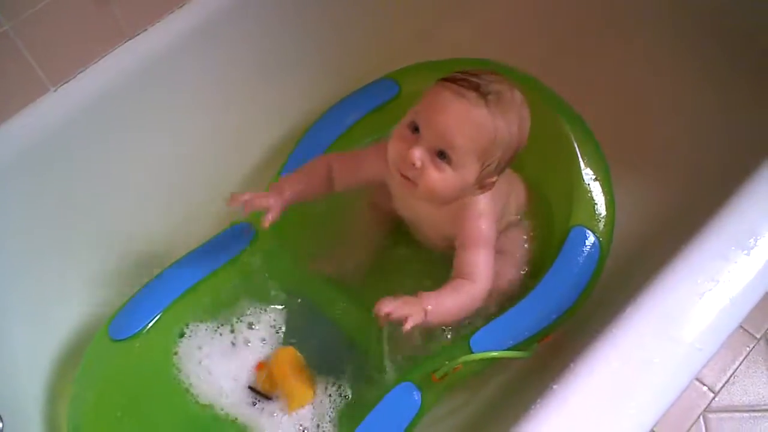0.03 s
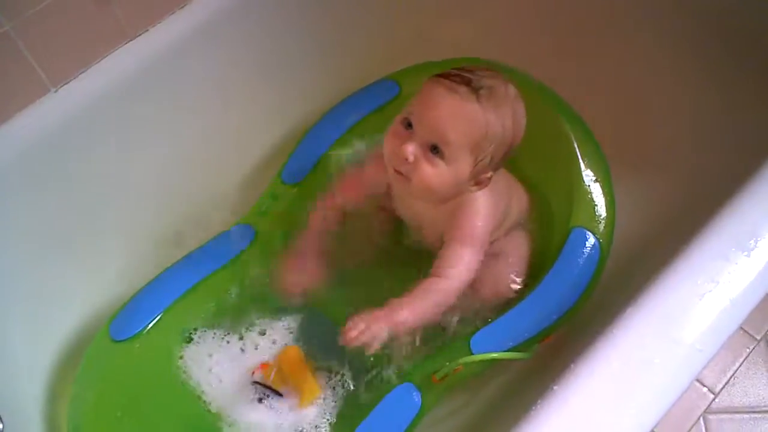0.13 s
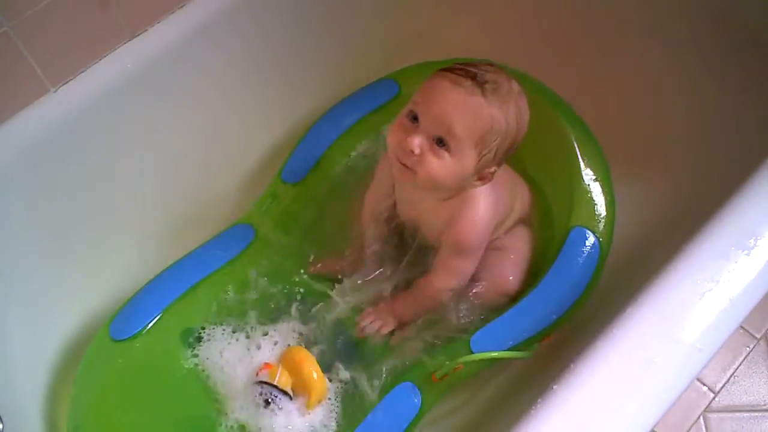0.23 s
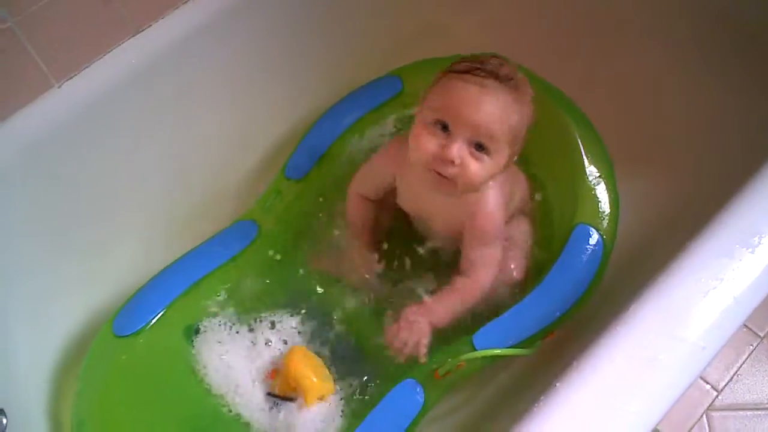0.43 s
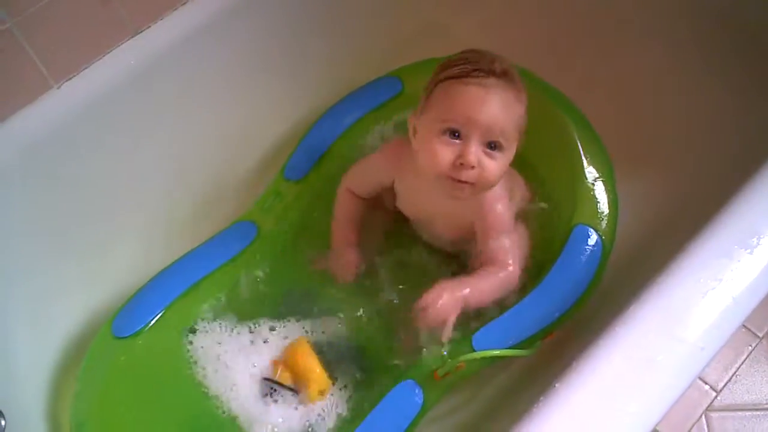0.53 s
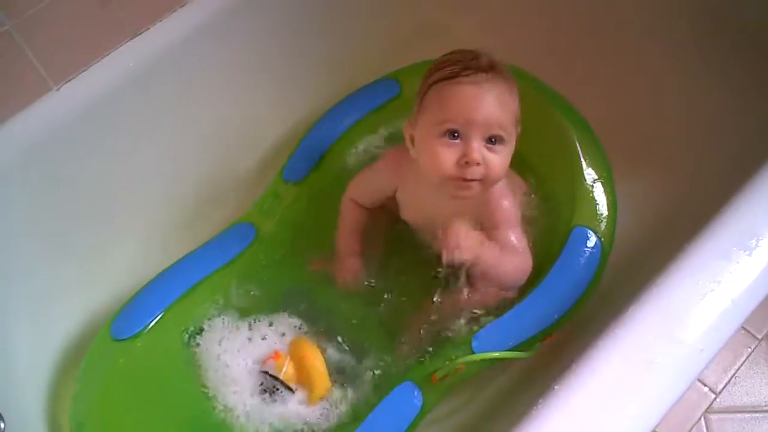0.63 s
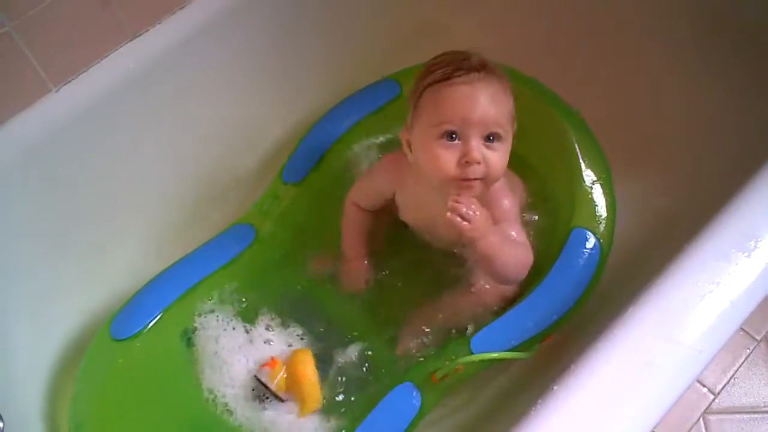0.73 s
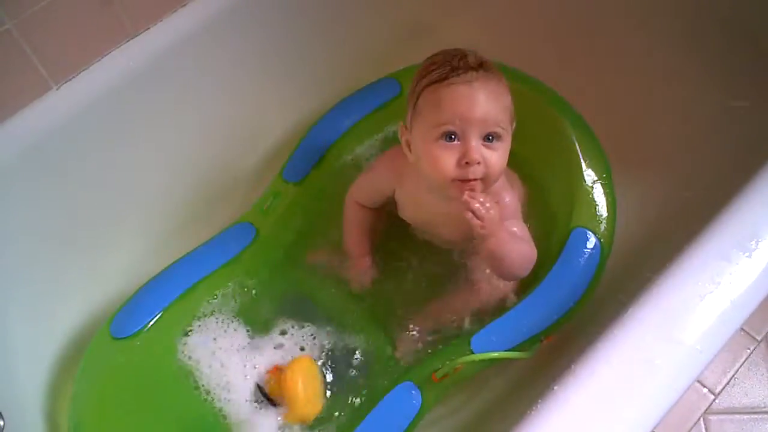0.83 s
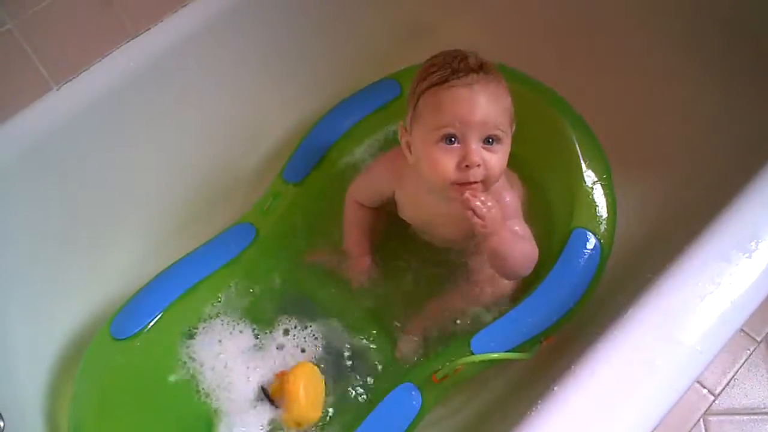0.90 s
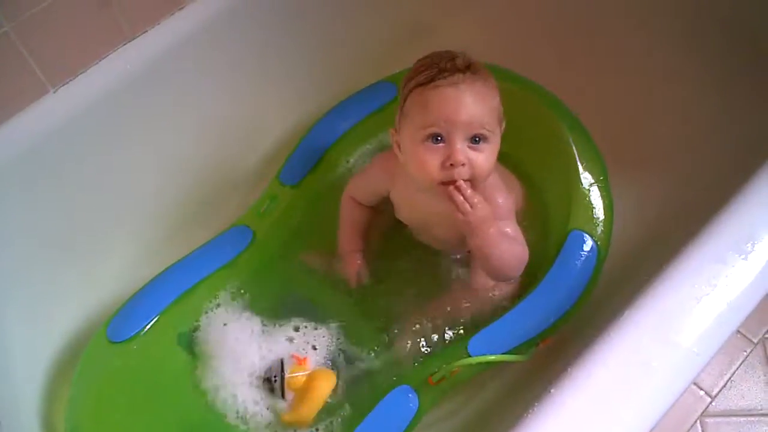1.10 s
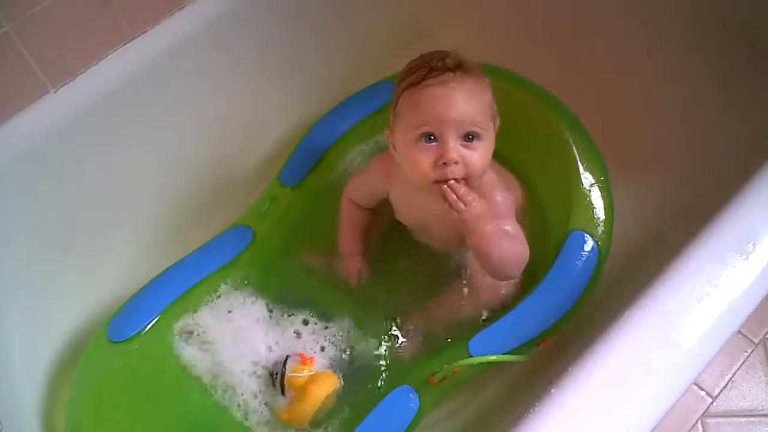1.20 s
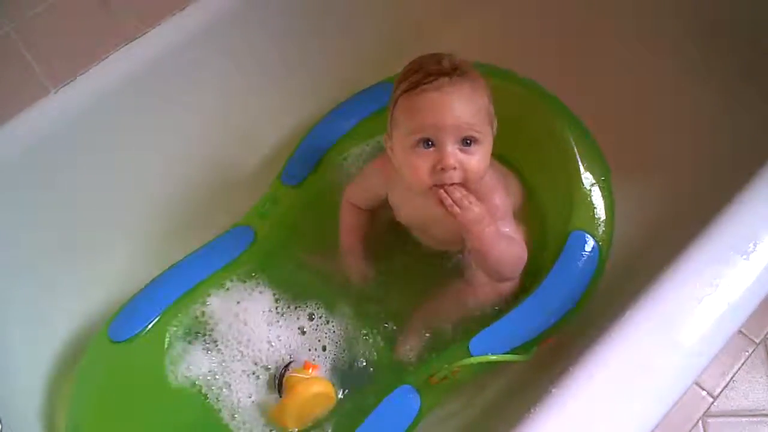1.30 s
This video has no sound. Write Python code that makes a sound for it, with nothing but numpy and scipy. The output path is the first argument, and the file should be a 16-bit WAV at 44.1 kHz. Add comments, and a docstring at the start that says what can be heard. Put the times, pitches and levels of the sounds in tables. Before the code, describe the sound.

A baby's hands slap and churn bathwater, which calms to drips in a tiled bathroom.

```python
"""A baby's hands slap bath water: sharp smacks, spray, soft thuds, two gulps as air pockets close.
Trapped bubbles ring; the churning settles into single drips and bubbles.
Tub walls and bathroom tiles echo, over a faint steady noise floor."""
import sys
import numpy as np
from scipy import signal
from scipy.fft import rfft, irfft, next_fast_len
from scipy.io import wavfile
from scipy.ndimage import map_coordinates

SR = 44100
rng = np.random.default_rng(int(sys.argv[2]) if len(sys.argv) > 2 else 0)


def bounce(signal):
    """Save signal as a 16-bit WAV file at the path given by the first command-line argument."""
    frames = np.transpose(np.atleast_2d(signal))
    limited = np.clip(frames, -1, 1)
    pcm = np.round(limited * 32767).astype(np.int16)
    wavfile.write(sys.argv[1], SR, pcm)


N = 59535

# All levels are relative.
# Impacts of hands and thrown water (time [s], level [dB], t60 [s], centre [Hz], half-width [oct])
SMACK_HITS = [(0.136, -43.5, 0.032, 2010, 0.84), (0.235, -58, 0.03, 8600, 0.3),
              (0.244, -34.5, 0.014, 7950, 0.27), (0.2526, -32, 0.0091, 1450, 0.52),
              (0.2526, -19.5, 0.0097, 7260, 0.64), (0.285, -38, 0.043, 6040, 0.58),
              (0.2963, -39, 0.033, 4600, 1.5), (0.44, -36.5, 0.021, 5650, 0.51),
              (.514, -38.5, 0.02, 5900, 0.47), (0.556, -37.5, 0.02, 3960, 0.44),
              (0.566, -38.5, 0.026, 4470, 0.43), (0.611, -52.5, 0.13, 4240, 1.1),
              (.661, -40.5, 0.022, 6700, 0.36), (0.7025, -38.5, 0.016, 5000, 0.55),
              (.744, -49.5, 0.037, 2480, 0.56), (0.801, -57.5, 0.025, 6500, 0.24),
              (0.87, -62, 0.063, 5340, .5), (0.8941, -52.5, 0.031, 3400, 0.29),
              (0.908, -60.5, 0.044, 4600, 0.49), (0.92, -55.5, 0.02, 6750, 0.71),
              (0.926, -50, 0.034, 1800, 0.31), (0.935, -35, 0.0071, 5170, 0.3),
              (.954, -49, 0.03, 3130, 0.39), (1.045, -56, 0.023, 4000, 0.23),
              (1.193, -60, 0.042, 685, 0.57)]
# Large spray drops landing (time [s], level [dB])
DROP_HITS = [(0.247, -37.5), (0.3294, -33), (0.3567, -42), (0.364, -32.5), (0.3753, -34), (0.4417, -44),
             (0.514, -43), (.521, -35.5), (0.5514, -38), (.571, -34.5), (0.617, -47), (0.7047, -49),
             (.922, -52)]
# Hands pushing into the water (time [s], level [dB])
THUD_HITS = [(.252, -61), (0.287, -63.5), (0.36, -64.5), (0.503, -68.5), (0.568, -66.5)]
# Single bubbles and drips (time [s], level [dB], pitch [Hz], t60 [s])
BUBBLE_RINGS = [(.002, -52.5, 1160, 0.027), (0.023, -53, 3990, 0.018), (0.033, -53.5, 5030, 0.021),
                (.037, -52.5, 2070, 0.019), (.061, -53, 1575, 0.052), (.069, -57, 5320, 0.016),
                (.078, -46, 2640, 0.014), (.089, -48.5, 2280, 0.014), (.139, -50, 675, 0.021),
                (.146, -63.5, 290, 0.094), (.253, -29, 2000, 0.0076), (.274, -35.5, 3170, 0.011),
                (.302, -29.5, 4950, 0.0088), (.338, -42, 2050, 0.019), (.347, -40, 1554, 0.016),
                (.378, -56.5, 226, 0.05), (.386, -46.5, 375, 0.052), (0.394, -38, 2576, 0.034),
                (.397, -32.5, 1175, 0.017), (0.408, -35.5, 1534, 0.029), (.417, -27.5, 2873, 0.011),
                (.448, -38.5, 577, 0.018), (.454, -37, 835, 0.019), (.449, -49, 323, 0.027),
                (.466, -29, 1470, 0.021), (.497, -37.5, 5250, 0.0089), (.515, -36.5, 1489, 0.054),
                (.521, -36.5, 1840, 0.032), (.521, -38, 3140, 0.023), (.524, -38, 845, 0.016),
                (.571, -25, 1190, 0.0038), (.613, -40.5, 1830, 0.036), (.653, -40.5, 1079, 0.046),
                (.655, -32.5, 2148, 0.017), (.662, -35, 1490, 0.013), (0.744, -36, 2027, 0.014),
                (0.88, -39, 1890, 0.0068), (.928, -37.5, 1178, 0.031), (.955, -37, 3670, 0.0056),
                (.956, -38, 3070, 0.0091), (.957, -38, 1920, 0.0068), (1.048, -57.5, 2120, 0.019),
                (1.110, -60.5, 1514, 0.035), (1.131, -64.5, 9900, 0.013), (1.192, -54, 1194, 0.03),
                (1.236, -55, 1780, 0.011), (1.253, -53, 1620, 0.013), (1.282, -65.5, 6680, 0.025),
                (1.297, -62.5, 3860, 0.018)]
# Air pockets closing under a hand (time [s], length [s], level [dB], start pitch [Hz], end pitch [Hz])
GULP_SWEEPS = [(0.38, .034, -42.5, 480, 1651), (0.444, .031, -40, 562, 2460)]
# Churn envelopes (time [s], spray [dB], bubbling [dB], slosh [dB])
CHURN_LEVELS = [(0, -64, -59, -68), (.04, -65.5, -59, -89), (0.089, -59.5, -66, -91),
                (.11, -66.5, -69, -81), (.17, -67, -78, -66), (.23, -75, -74, -80), (0.244, -61, -74, -61),
                (0.259, -46, -54, -75), (.282, -54, -54, -62.5), (.34, -52, -43, -56.5),
                (0.37, -51.5, -53, -54.5), (0.407, -49.5, -41.5, -51), (0.456, -61, -46.5, -56.5),
                (.49, -51.5, -50, -64), (.53, -61, -43, -60.5), (.597, -52, -56, -61.5),
                (0.651, -53, -43, -69), (.73, -61, -62, -80), (.79, -71.5, -77, -76.5),
                (1.35, -74.5, -77, -86)]
# Spectral shape per source (frequency [Hz], gain [dB])
DROP_EQ = [(1000, -24), (4500, 4.5), (9500, 2), (12500, -21), (16000, -24)]
THUD_EQ = [(20, -23), (45, -21), (110, -19.5), (240, 10), (500, -25), (1500, -62)]
SPRAY_EQ = [(1500, -7.5), (3200, 0.5), (5000, -1.5), (8500, -6.5), (10500, -13.5), (12500, -21),
            (16000, -28)]
BUBBLING_EQ = [(350, -13.5), (600, -10.5), (1000, -2.5), (1500, 0.5), (2000, -2.5), (2500, -4), (3500, -9),
               (5000, -10)]
SLOSH_EQ = [(25, -32), (70, -33), (150, -13), (230, 0), (400, -3.5), (650, 5.5), (1100, -5)]
FLOOR_EQ = [(25, -26), (70, -19), (150, -7), (280, 3.5), (600, 4), (1500, 2), (3000, -4.5), (8000, -18.5),
            (12000, -16), (16000, -21)]
# Decay of the tiled room (frequency [Hz], t60 [s])
ROOM_T60 = [(200, 0.58), (1200, 0.31), (3500, 0.25), (8000, 0.23), (15000, 0.2)]


def smacks(attack_s=0.0016):
    """Each impact bursts into a short crackle of droplets."""
    out, t = np.zeros(N), np.arange(SR // 10) / SR
    for at_s, db, t60_s, centre_hz, width_oct in SMACK_HITS:
        def band(hz):
            detune = np.log2((hz + 1) / centre_hz) / width_oct
            return (1 + detune ** 2 / 4) ** -2 / np.sqrt(1 + (hz / 11000) ** 12)
        crackle = unit_rms(filtered(rng.standard_normal(len(t)), band))
        attack = (1 - np.exp(-t / attack_s)) ** 2
        add(out, at_s, amp(db + 7.5 - 60 * t / t60_s) * attack * crackle)
    return out


def drops(t60_s=0.0058):
    """A falling drop hits the surface with one bright tick."""
    out, t = np.zeros(N), np.arange(SR // 30) / SR
    for at_s, db in DROP_HITS:
        add(out, at_s, amp(db - 60 * t / t60_s) * noise(len(t), DROP_EQ))
    return out


def thuds(t60_s=0.11, attack_s=0.00097):
    """Each push on the water gives a faint low thud."""
    out, t = np.zeros(N), np.arange(SR // 4) / SR
    attack = 1 - np.exp(-t / attack_s)
    for at_s, db in THUD_HITS:
        add(out, at_s, amp(db - 60 * t / t60_s) * attack * noise(len(t), THUD_EQ))
    return out


def bubbles(rise=0.038, wobble_depth=0.054, wobble_per_s=510, attack_s=0.00089):
    """A trapped bubble rings, unsteady in moving water, its pitch rising as it nears the surface."""
    out, t = np.zeros(N), np.arange(SR // 6) / SR
    attack = 1 - np.exp(-t / attack_s)
    for at_s, db, hz, t60_s in BUBBLE_RINGS:
        age = t / t60_s
        pitch_hz = hz * (1 + rise * np.minimum(age, 1) + wobble_depth * wobble(wobble_per_s, len(t)))
        decay = amp(db + 2 - 60 * age ** 1.554)  # holds, then dies quickly
        add(out, at_s, decay * attack * np.sin(2 * np.pi * np.cumsum(pitch_hz) / SR))
    return out


def gulps(spread=0.1238, swell_db=15.5):
    """A shrinking air pocket sweeps three close partials upward, swelling until it shuts."""
    out = np.zeros(N)
    for at_s, length_s, db, start_hz, end_hz in GULP_SWEEPS:
        progress = np.linspace(0, 1, int(length_s * SR))
        turns = np.cumsum(start_hz * (end_hz / start_hz) ** progress) / SR
        partials = sum(amp(-5 * abs(k)) * np.sin(2 * np.pi * (turns * np.exp(k * spread) + rng.random()))
                       for k in (-1, 0, 1))
        envelope = amp(swell_db * progress) * signal.windows.tukey(len(progress), 0.3)
        add(out, at_s, amp(db) * unit_rms(partials * envelope))
    return out


def churn(clump_db=0.5, clumps_per_s=200, tick_db=-10):
    """Stirred water: clumping spray with sparse droplet ticks, mid-sized bubbles, deep slosh."""
    times_s, *levels_db = np.transpose(CHURN_LEVELS)
    spray_gain, bubbling_gain, slosh_gain = [
        amp(np.interp(np.arange(N) / SR, times_s, db)) for db in levels_db]
    mist = swarm(2000, band_hz=(2550, 15100), cycles=5, spread_db=4.2, rise=0.05, hiss=0.42, size=160)
    ticks = swarm(130, band_hz=(3200, 11700), cycles=2.7, spread_db=2.5, rise=0.1, hiss=0.02, size=128)
    spray = unit_rms(mist * amp(clump_db * wobble(clumps_per_s, N))) + amp(tick_db) * ticks
    bubbling = swarm(1800, band_hz=(557.4, 4170), cycles=17.5, spread_db=3,
                     rise=0.24, hiss=0.16, size=1024)
    slosh = swarm(600, band_hz=(205.2, 869), cycles=8.3, spread_db=2, rise=0.14, hiss=0.69, size=2048)
    return (spray_gain * coloured(spray, SPRAY_EQ)
            + bubbling_gain * coloured(bubbling, BUBBLING_EQ)
            + slosh_gain * coloured(slosh, SLOSH_EQ))


def swarm(count, band_hz, cycles, spread_db, rise, hiss, size):
    """Steady crowd of random bubbles, each a damped rising sine of `size` samples, plus hiss."""
    onset_draw, pitch_draw, life_draw, level_draw = rng.random((count, 4)).T[:, :, None]
    lo_hz, hi_hz = band_hz
    hz = lo_hz * (hi_hz / lo_hz) ** pitch_draw
    t60_s = cycles * (0.5 + life_draw) / hz
    t = np.arange(size) / SR
    age = np.minimum(t / t60_s, 2)
    strength = amp(spread_db * np.minimum(-np.log(1 - level_draw), 3)) * hz / hi_hz
    envelope = strength * amp(-60 * age) * (1 - np.exp(-t * hz))
    rings = envelope * np.sin(2 * np.pi * hz * t * (1 + rise * age / 2))
    indices = (onset_draw * N).astype(int) + np.arange(size)
    crowd = np.bincount(indices.ravel(), rings.ravel(), N)[:N]
    return unit_rms(crowd) + hiss * rng.standard_normal(N)


def bathroom(x, hops=16):
    """Splashes move from spot to spot: each overlapping stretch gets its own echo."""
    hop = N // hops + 1
    padded = np.pad(x, (hop, 2 * hop))
    wet = np.zeros(N + 4 * hop + SR)
    for i in range(0, (hops + 1) * hop, hop):
        stretch = padded[i:i + 2 * hop] * signal.windows.cosine(2 * hop)
        reflected = signal.fftconvolve(stretch, echo())
        wet[i:i + len(reflected)] += reflected
    return x + wet[hop:hop + N]


def echo(tiles_db=-5.5, tub_db=-7.5, tub_t60_s=0.046):
    """Impulse response of one spot: quick tub-wall reflections, longer tail from the tiles."""
    hz, frame_s, spectra = signal.stft(rng.standard_normal(SR // 2), SR, nperseg=256)
    decay = amp(-60 * frame_s / log_interp(ROOM_T60, hz)[:, None])
    tiles = signal.istft(spectra * decay, SR, nperseg=256)[1]
    t = np.arange(len(tiles)) / SR
    tiles *= 1 - np.exp(-t / 0.005)
    tub = rng.standard_normal(len(t)) * amp(-60 * t / tub_t60_s) * (t > 0.0015)
    return amp(tiles_db) * tiles / np.linalg.norm(tiles) + amp(tub_db) * tub / np.linalg.norm(tub)


def noise_floor(level_db=-69.5):
    """Faint steady background noise."""
    return amp(level_db) * noise(N, FLOOR_EQ)


def amp(db):
    """Decibels to gain."""
    return 10 ** (np.asarray(db) / 20)


def unit_rms(x):
    """Scale to rms 1."""
    return x / np.sqrt(np.mean(x ** 2) + 1e-20)


def log_interp(points, hz):
    """Interpolate (frequency [Hz], value) points on a log axis."""
    knots_hz, values = np.transpose(points)
    return np.interp(np.log(hz + 1), np.log(knots_hz + 1), values)


def filtered(x, response):
    """Apply the gain response(hz) by FFT."""
    size = next_fast_len(len(x) + 8192)
    return irfft(rfft(x, size) * response(np.fft.rfftfreq(size, 1 / SR)), size)[:len(x)]


def coloured(x, eq):
    """Shape x by an EQ table, at rms 1."""
    return unit_rms(filtered(x, lambda hz: amp(log_interp(eq, hz))))


def noise(size, eq):
    """Shaped noise at rms 1."""
    return coloured(rng.standard_normal(size), eq)


def wobble(knots_per_s, size):
    """Smooth random curve."""
    return map_coordinates(rng.standard_normal(2048), [np.arange(size) * knots_per_s / SR], mode="wrap")


def add(out, at_s, sound):
    """Mix a sound in at a given time."""
    i = max(0, round(at_s * SR))
    out[i:i + len(sound)] += sound[:max(0, N - i)]


def scene():
    """Splashing in the bathroom over the noise floor, mono."""
    water = amp(-1.5) * (smacks() + drops() + thuds() + bubbles() + gulps() + churn())
    return (bathroom(water) + noise_floor())[None]


def record(dry, cutoff_hz=16000):
    """Brick-wall low-pass."""
    return np.array([filtered(x, lambda hz: hz < cutoff_hz) for x in dry])


dry = scene()
out = record(dry)
bounce(out)
```